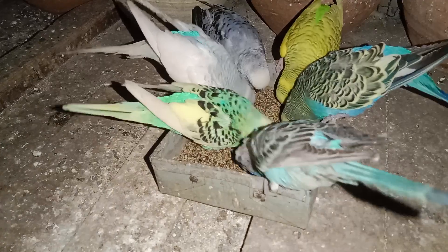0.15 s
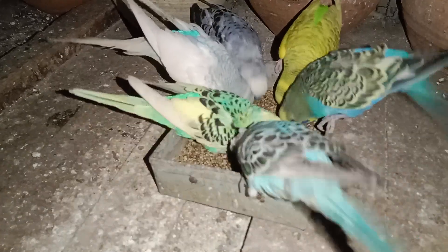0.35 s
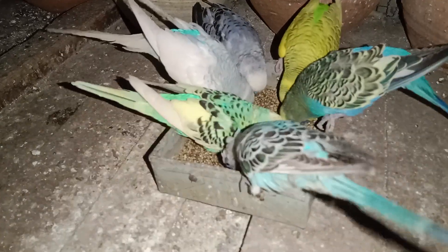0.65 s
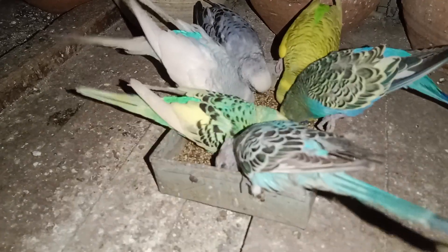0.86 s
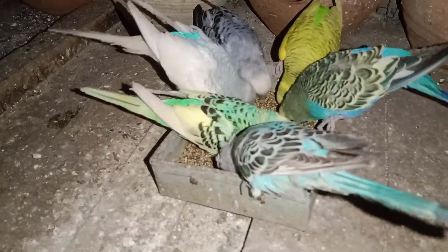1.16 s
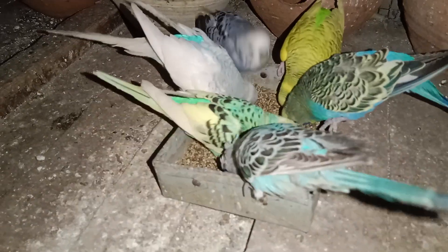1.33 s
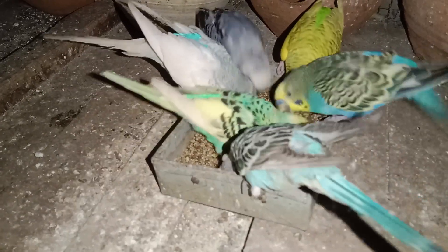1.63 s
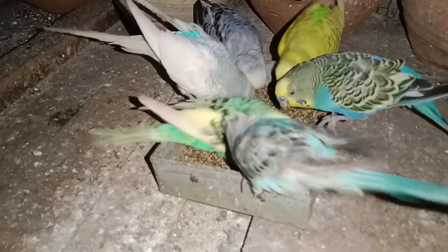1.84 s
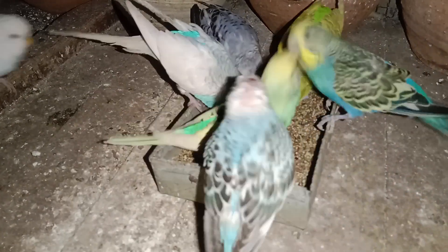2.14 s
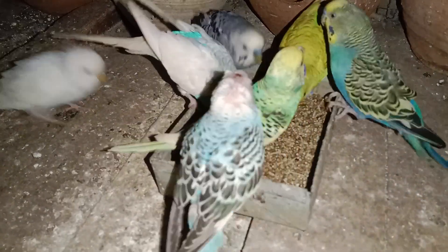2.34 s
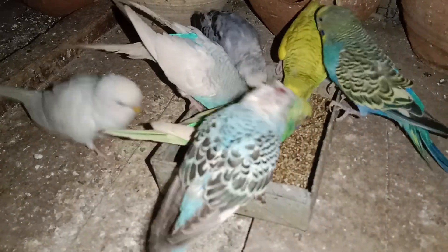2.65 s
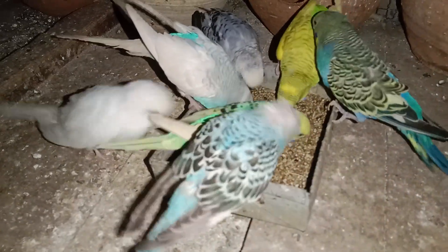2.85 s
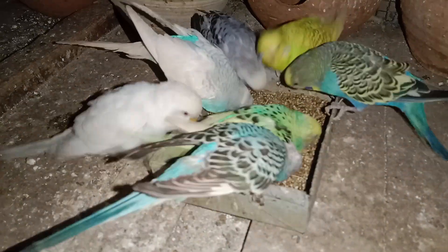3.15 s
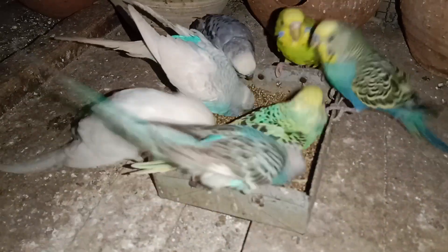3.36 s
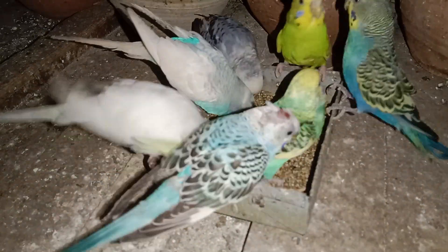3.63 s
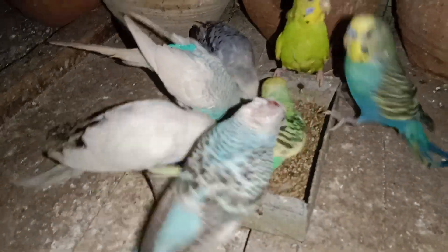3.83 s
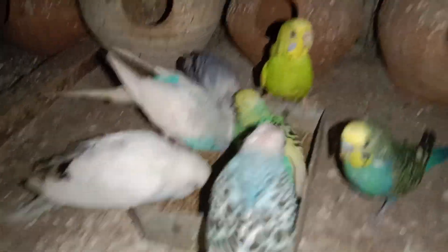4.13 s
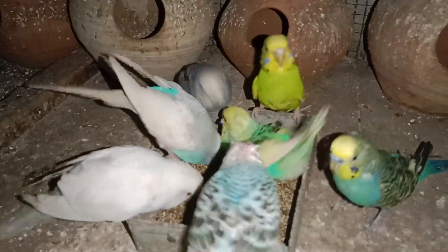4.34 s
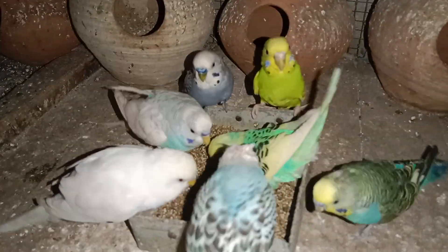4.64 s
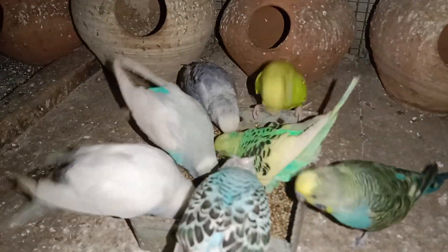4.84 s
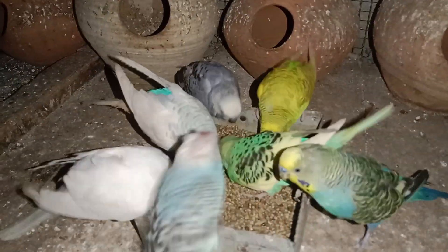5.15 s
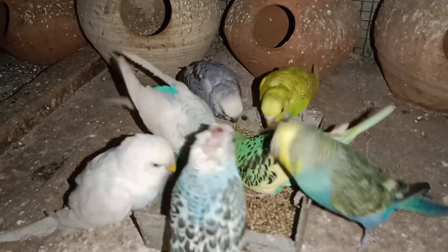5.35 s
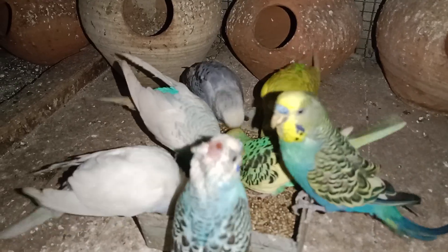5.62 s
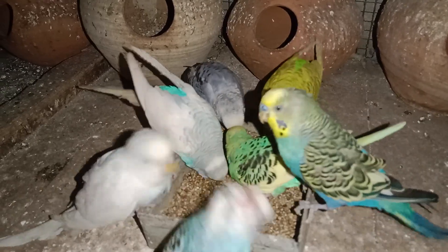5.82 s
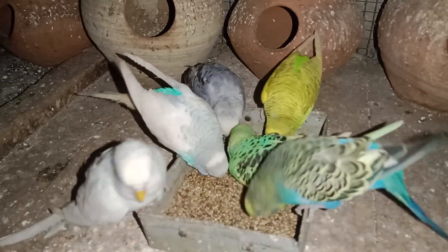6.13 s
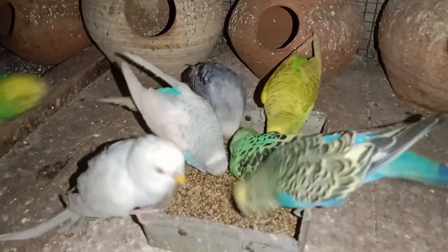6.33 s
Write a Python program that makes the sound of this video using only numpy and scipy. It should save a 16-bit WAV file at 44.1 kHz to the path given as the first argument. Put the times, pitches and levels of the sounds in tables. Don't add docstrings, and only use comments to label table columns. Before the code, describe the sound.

Small parrots feed at a hollow seed tray in a concrete aviary, captured close on a phone with a short hard echo. From 0 to 1.6 s it is sparse: faint falling whistles, nasal warbles, soft squawks, dry husk ticks and hollow knocks around 0.7-0.8 s. A sharp rising chirp snaps out near 1.8 s, followed by quick softer chattering and two piercing chirps at 2.4-2.5 s. From 3.0 to 3.4 s loud chirps pile up rapidly; a hoarse squawk rasps at 3.5 s, a tray knock lands at 3.8 s, and low wing puffs accompany bright chirps until 4.35 s. After a lull, whistles at 4.8 s lead into mellow chirps and chatter around 5 s. Tumbling far whistles crowd 5.6-6.0 s, then a strong hollow knock at 6.2 s, thin chirps and a raspy squawk finish. Rustling hiss breathes with the calls.

```python
import sys
import numpy as np
from scipy import signal
from scipy.io import wavfile
from scipy.ndimage import uniform_filter1d, minimum_filter1d

SR = 44100
rng = np.random.default_rng(int(sys.argv[2]) if len(sys.argv) > 2 else 0)


def materialize(psi):
    bounded = np.clip(np.atleast_2d(psi).T, -1, 1)
    quanta = np.round(bounded * 32767).astype(np.int16)
    wavfile.write(sys.argv[1], SR, quanta)


def ratio_of_db(decibels):
    return 10 ** (np.asarray(decibels, float) / 20)


N = 285768

# (time [s], level [dB])
STIR_ROWS = [(0, -86), (.31, -75), (.6, -99), (.92, -72), (1.6, -78), (1.8, -52.5), (1.96, -73),
             (2.1, -55.5), (2.49, -49), (2.58, -66.5), (2.65, -56), (3.68, -50), (4.22, -57), (4.55, -82.5),
             (5.18, -49), (5.4, -90.5), (5.76, -47), (6.48, -51.5)]
# (middle [s], length [s], level [dB])
WING_PUFFS = [(.28, 0.23, -74), (.86, 0.043, -63), (1.2, 0.57, -87), (1.75, 0.43, -69), (2.7, 0.5, -54.5),
              (2.88, 0.1, -69), (3.07, 0.15, -56), (3.2, 0.28, -71.5), (3.93, 0.3, -44.5),
              (4.08, 0.24, -47), (4.2, .15, -63), (5.02, 1, -63), (5.63, 0.36, -63), (5.8, 0.4, -74.5),
              (6.21, 0.37, -71), (6.42, 0.34, -65)]
# (middle [s], length [s], level [dB])
DRONE_SWELLS = [(.85, .1, -66), (2.38, 0.15, -61.5), (2.74, 0.04, -48), (3.07, 0.037, -51),
                (3.52, 0.17, -57.5), (3.73, 0.11, -57), (4.05, 0.73, -59), (4.6, 0.75, -63),
                (4.86, 0.51, -53), (5.08, 0.54, -56), (5.23, 0.27, -55.5), (5.63, 0.13, -88),
                (6.21, 0.25, -60), (6.42, 0.037, -41.5)]
# (frequency [Hz], level [dB])
PUFF_SPECTRUM = [(25, -46.5), (50, 8), (100, -5), (200, -4), (330, -24.5), (700, -23), (1200, -48.5)]
# (frequency [Hz], level [dB])
BABBLE_SPECTRUM = [(290, -69), (500, -39), (846, -55.5), (1010, -14.5), (1430, -2.5), (2130, 9), (4200, 4),
                   (5460, -30.5), (9240, -120)]
# (frequency [Hz], level [dB])
HISS_SPECTRUM = [(2240, -35.5), (3800, -10.5), (4470, 14.5), (6610, 8), (7730, 8), (8870, -37),
                 (9370, -25.5), (14900, -51), (16000, -67)]
# (start [s], end [s], start pitch [Hz], end pitch [Hz], level [dB], second harmonic [dB])
COO_CALLS = [
    (1.04, 1.095, 386, 463, -62.5, -36),
    (1.078, 1.248, 548, 525, -62, -36),
    (1.184, 1.347, 647, 640, -75, -26),
    (1.772, 1.79, 713, 720, -52.5, -32),
    (2.01, 2.09, 604, 600, -74, -32),
    (4.658, 4.686, 782, 774, -66.5, -29),
    (4.989, 5.049, 719, 710, -60.5, -29.5),
    (5.164, 5.25, 614, 600, -70, -26),
    (5.316, 5.366, 688, 600, -67.5, -31),
]
# (start [s], end [s], start
# pitch [Hz], end pitch [Hz], level [dB])
WHISTLE_CALLS = [(0.08, 0.106, 2030, 2100, -54), (0.1, 0.135, 1940, 1560, -56),
                 (0.134, 0.16, 2100, 2070, -54), (0.175, 0.213, 1330, 1950, -51.5),
                 (0.208, 0.236, 3180, 2960, -58), (0.739, 0.761, 1800, 2150, -54),
                 (0.785, 0.803, 1755, 1790, -45.5), (0.799, 0.819, 1950, 1866, -45),
                 (0.485, 0.497, 2680, 2360, -50.5), (0.492, 0.512, 2176, 2110, -42.5),
                 (0.511, 0.539, 2030, 1360, -51), (0.513, 0.525, 2330, 2130, -52),
                 (1.153, 1.176, 2290, 2170, -42.5), (1.167, 1.184, 2650, 2800, -46.5),
                 (1.176, 1.203, 2500, 2070, -48), (2.623, 2.693, 2730, 2000, -48.5),
                 (1.568, 1.621, 4300, 3880, -57), (1.591, 1.636, 3260, 2650, -43),
                 (1.602, 1.638, 2650, 2040, -52.5), (1.635, 1.656, 1745, 1800, -38.5),
                 (1.653, 1.663, 2930, 2630, -37.5), (1.666, 1.713, 2440, 1950, -40),
                 (2.377, 2.43, 2880, 2780, -38.5), (2.428, 2.476, 3500, 2720, -48.5),
                 (2.455, 2.498, 2550, 1926, -37), (3.402, 3.476, 1050, 1590, -46),
                 (3.486, 3.51, 2650, 2510, -41), (3.481, 3.51, 3520, 3570, -45),
                 (3.483, 3.51, 4360, 4240, -38), (3.506, 3.56, 1122, 1734, -43.5),
                 (4.068, 4.128, 5080, 5160, -37), (4.765, 4.808, 2775, 2690, -42),
                 (4.802, 4.831, 4740, 2840, -42.5), (4.823, 4.856, 2870, 2250, -40),
                 (4.842, 4.911, 2287, 1800, -35),
                 (5.213, 5.251, 2140, 2060, -30.5), (5.255, 5.275, 1890, 1760, -35.5),
                (5.276, 5.335, 1766, 1670, -55.5), (5.288, 5.334, 4150, 4050, -74),
                (5.583, 5.626, 5150, 4050, -38.5), (5.618, 5.663, 3430, 2340, -40),
                (5.642, 5.725, 4400, 3374, -37), (5.703, 5.749, 4720, 2970, -33.5),
                (5.743, 5.769, 3970, 3030, -35.5), (5.794, 5.82, 2875, 2686, -26.5),
                (5.703, 5.734, 2800, 2390, -35.5), (5.781, 5.801, 1710, 1990, -47),
                (5.802, 5.834, 2400, 1773, -33), (5.844, 5.871, 1940, 1485, -36.5),
                (5.826, 5.845, 3500, 3500, -40), (5.862, 5.9, 3630, 3700, -45),
                (5.883, 5.935, 2810, 2785, -34.5), (5.942, 5.976, 2240, 1630, -33.5),
                (5.985, 6.02, 3280, 2620, -30)]
# (start [s], end [s], start pitch [Hz], level [dB])
SLIDE_CALLS = [
    (1.654, 1.667, 1540, -43.5),
    (1.705, 1.722, 1754, -37),
    (1.567, 1.602, 4900, -66),
    (4.731, 4.77, 3700, -46),
    (5.657, 5.696, 2340, -39),
    (5.773, 5.785, 1970, -27),
]
# (start [s], end [s], pitch [Hz], level [dB])
MURMUR_CALLS = [(0.008, 0.044, 1180, -58), (1.02, 1.042, 1135, -50), (1.047, 1.078, 1210, -48),
                (1.777, 1.781, 904, -30), (2.204, 2.264, 1212, -48.5), (3.169, 3.213, 1066, -50),
                (3.255, 3.303, 1153, -44.5), (3.508, 3.512, 1150, -34), (3.987, 4.054, 1123, -40),
                (4.587, 4.592, 1090, -46.5), (4.834, 4.859, 1069, -50.5), (5.305, 5.372, 825, -39.5),
                (5.33, 5.428, 1450, -59.5)]
# (start [s], end [s], start pitch [Hz], end pitch [Hz], level [dB])
REEDY_CALLS = [(0.14, 0.179, 1490, 1104, -48.5), (0.208, 0.237, 1924, 1360, -46),
               (0.228, 0.26, 1483, 994, -38.5), (0.262, 0.28, 1200, 1100, -60),
               (0.475, 0.49, 1090, 1070, -68), (0.543, 0.557, 1410, 1370, -64),
               (0.686, 0.731, 1233, 1256, -53), (0.716, 0.756, 2050, 1800, -51.5),
               (0.755, 0.794, 1900, 1700, -52.5), (0.812, 0.837, 1534, 1390, -49.5),
               (0.829, 0.853, 1396, 1012, -37), (1.102, 1.167, 1150, 845, -43.5),
               (1.194, 1.227, 1564, 1463, -51.5), (1.223, 1.249, 1456, 972, -38.5),
               (1.378, 1.421, 1110, 1060, -54), (1.449, 1.481, 1203, 995, -46),
               (2.747, 2.757, 1140, 1280, -45.5), (2.782, 2.815, 1320, 1840, -76),
               (2.885, 2.897, 976, 1046, -35.5), (4.735, 4.787, 1260, 1303, -67),
               (4.76, 4.782, 2180, 2004, -45.5), (6.212, 6.278, 1980, 1895, -47.5)]
# (start [s], end [s], start pitch [Hz], end pitch [Hz], level
# [dB])
FOOT_THUDS = [
    (2.725, 2.755, 478, 397, -63),
    (3.038, 3.085, 463, 170, -48.5),
    (3.13, 3.192, 230, 191, -66),
    (4.58, 4.62, 340, 279, -70.5),
    (4.6, 4.7, 520, 527, -75),
    (4.85, 4.933, 285, 280, -66),
    (4.995, 5.049, 494, 492, -67),
    (5.885, 5.962, 484, 192, -47),
    (6.17, 6.228, 280, 170, -55),
    (6.25, 6.32, 300, 151, -51),
]
# (time [s], peak [dB])
FOOT_KNOCKS = [(0.713, -16.5), (0.8, -25.5), (2.735, -42), (3.045, -36), (3.808, -10), (5.546, -39.5),
               (5.592, -30.5), (5.63, -24.5), (5.89, -21.5), (6.23, -6.5), (6.258, -42)]
# (frequency [Hz], level [dB], t60 [s])
TRAY_MODES = [(340, -15, 0.084), (449.2, -1, 0.12), (560, -38.5, 0.057), (210.2, -24, 0.22)]
# (time [s], peak [dB], ring [Hz])
HUSK_CRACKS = [(0.154, -31, 2540), (0.299, -19, 6800), (0.5252, -29, 4300), (0.727, -33, 5330),
               (1.1485, -28.5, 2570), (1.297, -47, 6280), (3.464, -21.5, 2540), (4.181, -41, 6380),
               (4.5392, -31.5, 2610), (4.668, -39, 4570), (2.737, -28, 5200), (5.9486, -35, 5450),
               (6.347, -35, 4050)]
# (start [s], end [s], level [dB], throat factor [ratio])
SQUAWK_CALLS = [(0.241, 0.284, -43.5, 0.95), (0.83, 0.856, -49, 0.55), (1.388, 1.398, -42.5, 0.72),
                (1.446, 1.485, -44.5, 0.61), (1.711, 1.76, -46, 1.07), (2.886, 2.926, -32.5, 0.79),
                (2.193, 2.258, -42.5, 0.38), (1.017, 1.108, -52, 0.55), (1.036, 1.069, -44.5, 0.43),
                (2.928, 2.945, -34.5, 0.89), (3.475, 3.515, -37.5, 0.44), (3.517, 3.624, -24, 0.98),
                (3.529, 3.62, -37, 0.57), (3.663, 3.704, -33.5, 0.88), (3.883, 3.956, -49.5, 1.03),
                (4.16, 4.197, -49, 1.09), (4.377, 4.403, -41.5, 0.98), (6.304, 6.368, -28, 0.92),
                (6.326, 6.372, -27, 0.78)]
# (frequency [Hz], width [Hz], level [dB])
THROAT_MODES = [(1800, 300, -30.5), (3400, 830, 1.5), (5000, 530, 9.5), (6630, 570, 11.5), (7270, 310, -14)]
# (frequency [Hz], level [dB])
PIPE_RESPONSE = [(700, -26.5), (1050, -3), (1600, -19.5), (2600, -3.5), (3500, 1.5), (5200, 7),
                 (6500, -7.5), (8000, -13.5), (9300, -45), (11000, -18.5), (15500, -27)]
# (time [s], peak [dB], second harmonic top [Hz], length [s], leap time constant [s])
SHRILL_CHIRPS = [(1.697, -25, 3740, 0.028, 0.0099), (1.7693, -3, 4503, 0.02, 0.0027),
                 (2.399, -4.5, 5960, 0.014, 0.0041), (2.488, -5, 6965, 0.021, 0.0035),
                 (3.042, -6, 6630, 0.03, 0.0046), (3.127, -2.5, 5650, 0.026, 0.0019),
                 (3.23, -8.5, 6070, 0.041, 0.0025), (3.2932, -3.5, 6840, 0.022, 0.0029),
                 (3.314, -2, 5940, 0.021, 0.0026), (3.377, 0, 5384, 0.029, 0.0026),
                 (3.629, -2.5, 5934, 0.035, 0.0057), (3.7439, -3, 5700, 0.035, 0.004),
                 (3.817, -6, 5700, 0.031, 0.0047), (4.0185, -1, 5570, 0.031, 0.0049),
                 (4.1039, -1, 5946, 0.02, .004), (4.269, -11, 5890, 0.038, 0.0053),
                 (4.351, -13.5, 5020, 0.035, 0.0048), (5.968, -15.5, 5404, 0.027, 0.0023),
                 (6.0492, -14.5, 5860, 0.026, 0.0013), (6.175, -11, 6320, 0.034, 0.0018),
                 (6.2435, -15, 6100, 0.031, 0.0011), (6.409, -12, 6310, 0.041, 0.0023)]
# (time [s], peak [dB], second harmonic top [Hz], length [s], fundamental [dB])
CHATTER_CHIRPS = [(1.72, -19, 5660, 0.011, -2.5), (1.8346, -26.5, 5910, 0.026, -6),
                  (1.891, -17, 4066, 0.022, -4), (1.91, -21.5, 5640, 0.015, -4),
                  (1.971, -23.5, 5720, 0.024, -4), (2.041, -17.5, 5680, 0.019, -3.5),
                  (2.103, -10, 4535, 0.023, -4), (2.1688, -11.5, 4550, 0.02, -4.5),
                  (2.3164, -13, 4400, 0.027, -8), (2.6132, -22, 6350, 0.021, -11),
                  (2.7, -11, 5870, 0.027, -5.5), (2.81, -34.5, 6460, 0.046, 8),
                  (2.995, -11, 5860, 0.019, -7.5), (3.116, -23, 6050, 0.0073, 10),
                  (3.184, -4, 6100, 0.023, -13), (3.249, -4, 5630, 0.019, -14.5),
                  (4.988, -10, 5300, 0.027, -5), (5.042, -5.5, 4860, .016, -2.5),
                  (5.161, -11.5, 6130, 0.025, -6), (5.759, -20, 4700, 0.013, -6),
                  (6.113, -21.5, 5970, 0.029, -7.5)]
# (time [s], peak [dB], second harmonic top [Hz], length [s], fundamental [dB])
MELLOW_CHIRPS = [(2.235, -29, 3990, 0.032, 10), (4.9186, -17, 5380, 0.03, 5),
                 (4.981, -12.5, 5490, 0.014, -4), (5.095, -15, 5500, 0.025, 0),
                 (5.229, -17, 4500, 0.023, 5.5), (5.3322, -18, 5230, 0.023, -1.5),
                 (5.595, -17.5, 4920, 0.026, 0), (5.6557, -17, 4740, 0.024, -2),
                 (5.725, -16.5, 4900, 0.027, -4.5), (5.889, -5.5, 5410, 0.012, -8),
                 (6.163, -16, 5210, 0.018, -4.5), (6.393, -22, 4750, 0.023, 1)]


def evened(x):
    return x / np.sqrt(np.mean(x ** 2) + 1e-20)


def level_db(x, size):
    return 10 * np.log10(abs(uniform_filter1d(x ** 2, size=size)) + 1e-12)


def read(points, hz):
    f, value = np.transpose(points)
    return np.interp(np.log(hz + 1), np.log(f + 1), value)


def add(mix, s, sound):
    part = mix[round(s * SR):][:len(sound)]
    part += sound[:len(part)]


def wobble(count, hz):
    b, a = signal.butter(2, min(hz / SR * 2, .9))
    return evened(signal.lfilter(b, a, rng.standard_normal(count + 400))[400:])


def resonate(x, hz, width_hz):
    turn = np.exp(2j * np.pi * np.cumsum(hz * np.ones(len(x))) / SR)
    r = np.exp(-np.pi * width_hz / SR)
    return 2 * (turn * signal.lfilter([1 - r], [1, -r], x / turn)).real


def resonate_twice(x, hz, width_hz, second_width_hz):
    return resonate(resonate(x, hz, width_hz), hz, second_width_hz)


def noise(spectrum, patchy_db, flicker_db):
    frames, hz = N // 128 + 5, np.fft.rfftfreq(512, 1 / SR)
    a, b, patches = rng.standard_normal((frames, 257, 3)).T
    patches = uniform_filter1d(patches, size=6, axis=0)
    patches = evened(uniform_filter1d(patches, size=8, axis=1))
    flicker = np.repeat(rng.standard_normal(frames), 7)[:frames]
    gain_db = read(spectrum, hz)[:, None] + patchy_db * patches + flicker_db * flicker
    z = (a + 1j * b) * ratio_of_db(gain_db)
    return evened(signal.istft(z, nperseg=512, noverlap=384)[1][:N])


def aviary(x, t60, wet_db):
    taps = np.zeros(SR // 4)
    at = np.arange(60, len(taps) - 20, 20)
    taps[at + rng.integers(0, 20, len(at))] = rng.choice([-1., 1.], len(at))
    taps *= ratio_of_db(-60 * np.arange(len(taps)) / SR / t60)
    return x + ratio_of_db(wet_db) * signal.oaconvolve(x, taps / np.linalg.norm(taps))[:N]


def stir_db():
    middle_db = -57
    time_s, db = np.transpose(STIR_ROWS)
    return np.interp(np.arange(N) / SR, time_s, db) - middle_db


def swells(rows, rest_db):
    out = np.full(N, ratio_of_db(rest_db))
    for middle, length, db in rows:
        shape = np.hanning(round(max(length, .03) * SR)) ** 2
        add(out, max(middle - length / 2, 0), ratio_of_db(db) * shape)
    return out


def air():
    hz, width_hz = 137.9, 14
    drone = evened(resonate_twice(rng.standard_normal(N), hz, width_hz, 2 * width_hz))
    puffs = swells(WING_PUFFS, rest_db=-84) * noise(PUFF_SPECTRUM, patchy_db=1.5, flicker_db=1)
    return puffs + ratio_of_db(4.0) * swells(DRONE_SWELLS, rest_db=-90) * drone


def warble(start, end, hz0, hz1, db, second_db, rough):
    u = np.linspace(0, 1, round(max(end - start, .01) * SR))
    hz = hz0 * (hz1 / hz0) ** (u ** 0.81) * (1 + rough * wobble(len(u), hz=600))
    phase = 2 * np.pi * np.cumsum(hz) / SR
    pouch = ratio_of_db(5.1 * np.exp(-((hz - 1100) / 250) ** 2))
    beak = ratio_of_db(13.9 * np.exp(-((2 * hz - 2150) / 450) ** 2))
    overtones = ratio_of_db(second_db) * (np.cos(3 * phase) + np.cos(4 * phase))
    voice = pouch * np.cos(phase) + ratio_of_db(second_db) * (beak * np.cos(2 * phase) + overtones)
    flutter = np.exp(15 * rough * wobble(len(u), hz=158))
    return ratio_of_db(db) * evened(voice * flutter) * signal.windows.tukey(len(u), .4)


def babble():
    out = np.zeros(N)
    for place, pitch, fall, span, size in rng.random((230, 5)):
        hz0 = 1500 * 2.9 ** pitch
        hz1 = hz0 * (1.1 - .45 * fall)
        add(out, place * N / SR, warble(0, .015 + .04 * span, hz0, hz1, -12 * size, -8, rough=.03))
    return evened(out)


def rustle(small):
    low = noise(BABBLE_SPECTRUM, patchy_db=5.5, flicker_db=3) + .4 * aviary(babble(), t60=.08, wet_db=0)
    shuffle = evened(resonate(resonate(rng.standard_normal(N), 270, 520), 310, 510))
    high = noise(HISS_SPECTRUM, patchy_db=5, flicker_db=3) * np.exp(.4 * wobble(N, hz=350))
    stir = stir_db()
    low_gain = ratio_of_db(-52 + 0.65 * stir)
    high_gain = ratio_of_db(-54.5 + 0.43 * stir)
    return signal.sosfilt(small, low_gain * low + high_gain * high) + ratio_of_db(-33.5) * low_gain * shuffle


def far_calls():
    slide_octaves_per_s, murmur_sag = 19, .92
    out = np.zeros(N)
    rows = [(*row, -22) for row in WHISTLE_CALLS]
    for start, end, hz, db in SLIDE_CALLS:
        rows.append((start, end, hz, hz * 2 ** (-slide_octaves_per_s * (end - start)), db, -14.5))
    rows += [(start, end, hz, hz * murmur_sag, db, -18) for start, end, hz, db in MURMUR_CALLS]
    rows += [(*row, -11) for row in REEDY_CALLS]
    for row in rows:
        add(out, row[0], warble(*row, rough=.021))
    return out


def knock(db):
    t = np.arange(8000) / SR
    ring = sum(ratio_of_db(d - 60 * t / t60) * np.sin(2 * np.pi * (f * t + rng.random())) for f, d, t60 in TRAY_MODES)
    throb = np.exp(.25 * wobble(len(t), hz=60))
    seed = evened(resonate_twice(rng.standard_normal(len(t)), 380, 260, 260))
    rattle = seed * ratio_of_db(-10.0 - 60 * t / 0.18)
    return ratio_of_db(db - 14.0) * (ring * throb + rattle) * np.clip(t / 0.0061, 0, 1)


def low_sounds():
    out = np.zeros(N)
    for row in COO_CALLS:
        add(out, row[0], warble(*row, rough=0.025))
    for row in FOOT_THUDS:
        add(out, row[0], warble(*row, second_db=-30, rough=.04))
    for s, db in FOOT_KNOCKS:
        add(out, s - .003, knock(db))
    return out


def husk(db, ring_hz):
    t = np.arange(1200) / SR
    snap = rng.standard_normal(len(t)) * ratio_of_db(-60 * t / .03)
    sound = resonate(snap, ring_hz, 800) + .5 * resonate(snap, 5100, 4000)
    return ratio_of_db(db - 9.5) * sound / abs(sound).max()


def squawk(start, end, db, throat):
    count = round(max(end - start, .01) * SR)
    flow = rng.standard_normal(count) * np.exp(0.27 * wobble(count, hz=423))
    arch = .06 * (np.sin(np.pi * np.arange(count) / count) - .6)
    beak = throat * (1 + arch + 0.014 * wobble(count, hz=40))
    sound = sum(ratio_of_db(d) * resonate_twice(flow, f * beak, w, 2 * w) for f, w, d in THROAT_MODES)
    return ratio_of_db(db) * evened(sound) * signal.windows.tukey(count, .3)


def chirp(db, second_hz, low_db, length, rise):
    t = np.arange(round(max(length, .008) * SR)) / SR
    u = t / length
    leap = 1 - np.exp(-np.maximum(t - .002, 0) / max(rise, .001))
    hz = 1050 + (second_hz / 2 - 1050) * leap - 0.1163 * second_hz * u ** 3
    jitter = .07 - .058 * np.clip(rise / .0026, .5, 1) * leap
    phase = 2 * np.pi * np.cumsum(hz * (1 + jitter * wobble(len(t), hz=500))) / SR
    low_start_db = 14 * np.log(np.clip(rise / 0.0039, .2, 1.3)) + 0.54 * min(db + 7.5, 0)
    opened = leap ** 1.1
    lift_db = opened * (low_db + 14.5) + (1.65 * low_db + 28 + low_start_db) * (1 - opened)
    voice = 0
    for k in range(1, 7):
        harmonic_db = read(PIPE_RESPONSE, k * hz) + lift_db * (k == 1) - 1.1 * k
        voice = voice + ratio_of_db(harmonic_db) * np.cos(k * phase)
    buzz_depth = rng.uniform(.02, .3)
    buzz_hz = rng.uniform(500, 1200) * (1 + .1 * wobble(len(t), hz=150))
    voice = voice * (1 + buzz_depth * np.cos(2 * np.pi * np.cumsum(buzz_hz) / SR))
    rasp = 0.26 * resonate_twice(rng.standard_normal(len(t)), 5000, 2000, 2800) * (1.2 - leap)
    puff = resonate(rng.standard_normal(len(t)), 2000, 1800) * (.3 - rng.uniform(0.088, 0.39) * leap)
    flutter = np.exp(.36 * wobble(len(t), hz=260))
    attack = np.clip(t / 0.00024, 0, 1)
    swell = 0.15 + 1.6 * leap ** 1.53 * np.clip(u / 0.14, .3, 1)
    fade = np.cos(np.clip(u, 0, 1) ** 1.62 * np.pi / 2) ** 2.12
    sound = (voice + rasp + puff) * attack * swell * fade
    cluck_db = -6 - 16 * rng.random() + 0.38 * low_db + low_start_db - 60 * t / 0.016
    cluck = np.sin(2 * np.pi * 1080 * t) * np.clip(t / 0.0014, 0, 1) * ratio_of_db(cluck_db)
    return ratio_of_db(db + 2.0) * (0.74 * flutter * sound / abs(sound).max() + cluck)


def near_calls():
    out = np.zeros(N)
    rows = []
    for s, db, hz, length, rise in SHRILL_CHIRPS:
        low_db = -18 - 3.5 * (hz - 5600) / 1000 - 150 * (length - .022)
        rows.append((s, db, hz, length, rise, low_db))
    for s, db, hz, length, low_db in CHATTER_CHIRPS:
        rise = 0.1226 * length * (hz / 5600) ** 2
        rows.append((s, db, hz, length, rise, low_db))
    for s, db, hz, length, low_db in MELLOW_CHIRPS:
        rows.append((s, db, hz, length, 0.00615, low_db))
    for s, db, hz, length, rise, low_db in rows:
        add(out, s, chirp(db, hz, low_db, length, rise))
    for row in SQUAWK_CALLS:
        add(out, row[0], squawk(*row))
    for s, db, ring_hz in HUSK_CRACKS:
        add(out, s, husk(db, ring_hz))
    return out


def spray(birds):
    top = signal.butter(2, [11500, 16000], "bandpass", fs=SR, output="sos")
    fitful_db = 9 * np.clip(wobble(N, hz=25), -2, .6)
    hiss = evened(signal.sosfilt(top, rng.standard_normal(N)))
    return ratio_of_db(-49 + 0.78 * level_db(birds, size=300) + fitful_db) * hiss


def noise_filter(birds):
    release_db_per_s = 3002
    held_db = -minimum_filter1d(-level_db(birds, size=100), size=450, origin=190)
    fall_db = np.arange(N) * release_db_per_s / SR
    held_db = np.maximum.accumulate(held_db + fall_db) - fall_db
    held_db = np.maximum(held_db, 1.7 * stir_db() - 70)
    return ratio_of_db(0.5 * np.clip(uniform_filter1d(held_db, size=160) + 40.0, -42, 0))


def scene():
    near, far = near_calls(), far_calls()
    opening = noise_filter(near + far)
    birds = aviary(near, t60=0.037, wet_db=-3.5) + aviary(far, t60=0.1, wet_db=-1.5)
    birds = birds * opening
    small = signal.butter(9, [985, 9000], "bandpass", fs=SR, output="sos")
    above = signal.butter(6, 9600, "highpass", fs=SR, output="sos")
    heard = signal.sosfilt(small, birds) + ratio_of_db(-23) * signal.sosfilt(above, birds)
    background = ratio_of_db(6) * rustle(small) * opening + air() * opening ** .35
    return (heard + spray(near + far) + low_sounds() + background)[None]


def top_cut(x):
    return signal.sosfilt(signal.butter(12, 16610, fs=SR, output="sos"), x)


def record(dry):
    limit = .8
    firm = signal.sosfilt(signal.butter(4, 45, "highpass", fs=SR, output="sos"), dry)
    peak = -minimum_filter1d(-abs(firm), size=200)
    limited = firm / uniform_filter1d(np.maximum(peak / limit, 1), size=180)
    edge = signal.firwin(511, 15600, window=("kaiser", 9), fs=SR)
    mix = signal.oaconvolve(limited, edge[None], "same")
    return top_cut(mix)


dry = scene()
out = record(dry)
materialize(out)
```